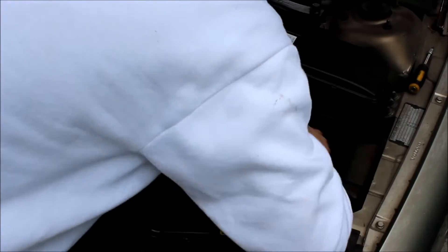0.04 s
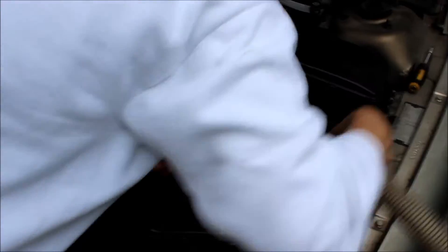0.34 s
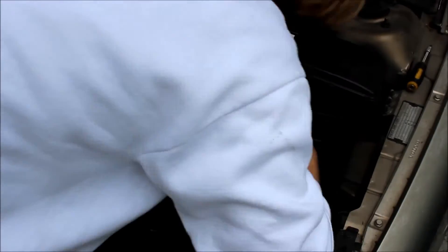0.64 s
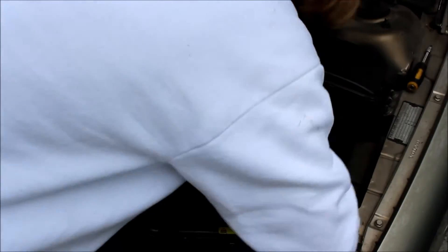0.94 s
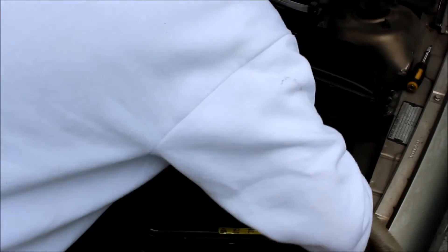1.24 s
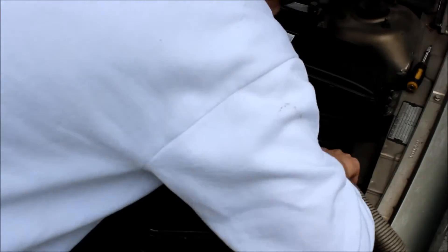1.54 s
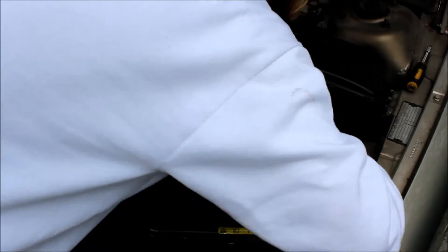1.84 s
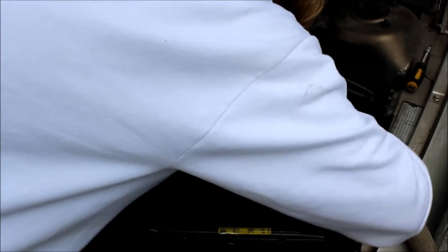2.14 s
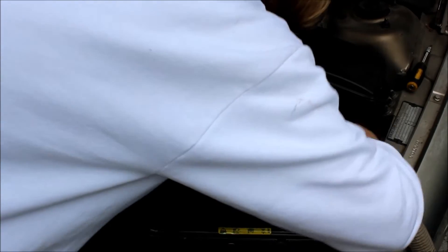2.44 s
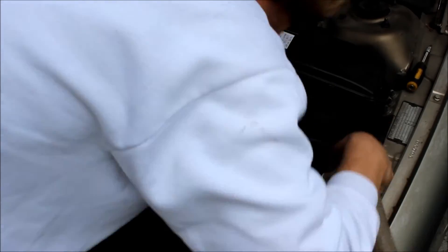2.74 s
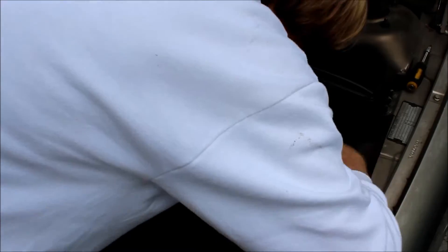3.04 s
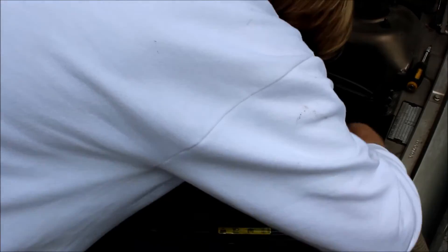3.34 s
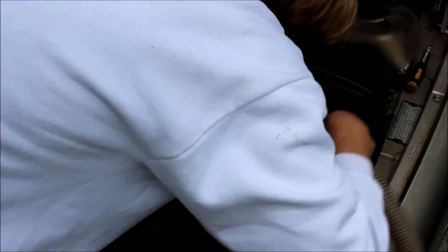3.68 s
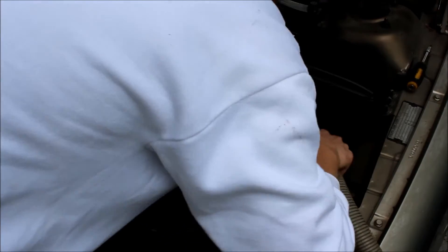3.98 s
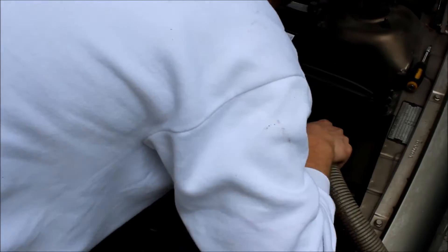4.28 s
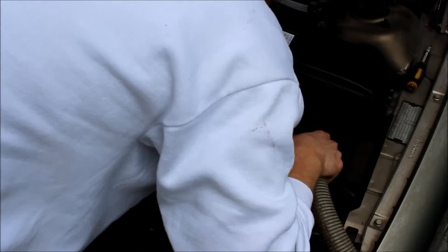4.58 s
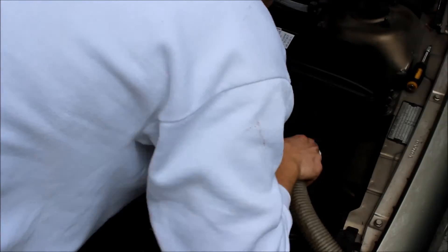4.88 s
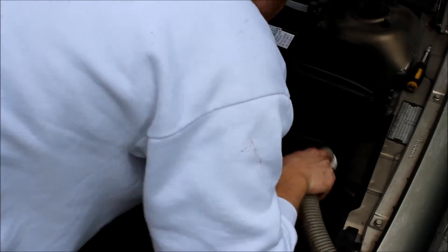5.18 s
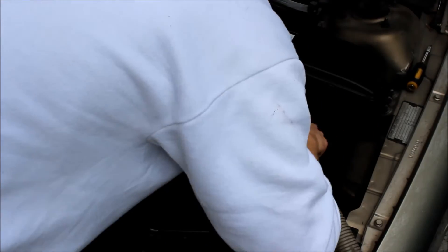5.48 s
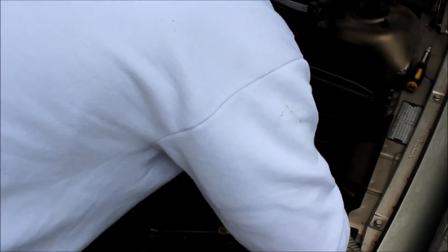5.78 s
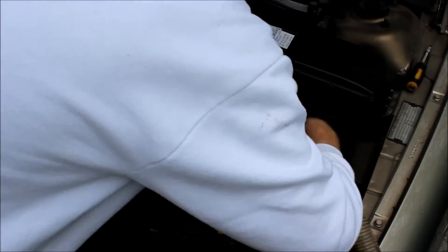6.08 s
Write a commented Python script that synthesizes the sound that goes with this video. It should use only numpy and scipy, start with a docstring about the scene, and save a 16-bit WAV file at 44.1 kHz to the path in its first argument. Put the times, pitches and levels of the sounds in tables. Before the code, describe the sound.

A vacuum cleaner runs close to the microphone, a high, even whine over rushing air, as it sucks dirt from a car's plastic air filter box. The nozzle hisses in short bursts while grit clacks and rattles up the hose. Early on it chokes briefly and the pitch rises, followed by louder hisses and clacks. The suction then turns smoother, until another flurry of grit and hissing near the end.

```python
"""A vacuum cleaner sucks dirt out of a car's air filter box, close to the microphone.
Its fan whines over rushing air. The nozzle hisses as it nears the plastic, and the motor speeds up
when it is choked. A faint drone lies underneath. Grit clacks up the hose, the hose bumps the car,
and air whistles past edges. A limiter turns everything down at loud hisses and clacks, so the whine dips."""
import sys
import numpy as np
from scipy import signal
from scipy.fft import rfft, irfft
from scipy.io import wavfile
from scipy.ndimage import uniform_filter1d, minimum_filter1d

SR = 44100
rng = np.random.default_rng(int(sys.argv[2]) if len(sys.argv) > 2 else 0)


def master(y):
    """Save y as 16-bit WAV."""
    cut = np.clip(np.atleast_2d(y).T, -1, 1)
    pcm = np.round(cut * 32767)  # scale
    wavfile.write(sys.argv[1], SR, pcm.astype(np.int16))


N = 278699
TIME = np.arange(N) / SR


def gain_of(db):
    """Turns decibels into a factor to multiply a sound by."""
    return 10 ** (np.asarray(db) / 20)


def unit_rms(x):
    """Scales a signal so that its average size (rms) is 1."""
    return x / np.sqrt(np.mean(x ** 2) + 1e-20)


def at_frequencies(rows, hz):
    """Reads between the rows of a frequency table, on a scale of octaves."""
    f, value = np.transpose(rows)
    return np.interp(np.log(hz + 1), np.log(f + 1), value)


def over_time(rows):
    """Joins the rows of a time table with straight lines: one curve per column."""
    s, *columns = np.transpose(rows)
    return [np.interp(TIME, s, column) for column in columns]


def drift(rate_hz):
    """A random wobble of size 1, up to about the given rate."""
    hz = np.fft.rfftfreq(2 ** 13, 64 / SR)
    slow = irfft(rfft(rng.standard_normal(2 ** 13)) / (1 + (hz / rate_hz) ** 2))
    return unit_rms(np.interp(np.arange(N) / 64, np.arange(2 ** 13), slow))


def tone(hz):
    """A pure tone that follows a pitch curve."""
    return np.sqrt(2) * np.sin(2 * np.pi * (np.cumsum(hz) / SR + rng.random()))


def touch(t, middle_s, length_s, squareness=3.0):
    """The nozzle closes in, stays a moment and lifts off: a curve from 0 to 1 and back."""
    return np.exp(-abs(2 * (t - middle_s) / length_s) ** squareness)


# The nozzle skims the plastic and hisses: middle t/s, length/s, extra rush/dB, brightness/dB
SKIMS = [(0.035, 0.13, 3.5, 0.2), (0.147, 0.059, 1.77, 0), (0.277, 0.12, 2.5, 1.6),
         (0.407, 0.175, 1.5, 0.3), (0.822, 0.095, 4.5, 0.5), (0.994, 0.055, 3, 0.5), (1.097, 0.093, 4, 1),
         (1.212, 0.023, 2.0, -0.5), (1.317, 0.095, 5.5, 0.5), (1.394, 0.0643, 3.5, 1),
         (1.495, 0.025, 2.5, 0.5), (1.564, 0.029, 3.5, 1.5), (1.637, 0.01, 2.5, 1), (1.739, 0.073, 3, 0.5),
         (2.031, 0.052, 9, 2.5), (2.14, 0.046, 5, 1.5), (2.199, 0.031, 9, 3), (2.341, 0.086, 10.5, 5),
         (2.537, 0.075, 6, 1.5), (3.257, 0.029, 4.5, 0.5), (3.354, 0.065, 3, 0.2), (3.441, 0.0349, 6, -0.5),
         (3.591, 0.098, 3.5, 0.9), (3.992, 0.034, 4.5, 1), (4.86, 0.059, 6, 0.5), (5.195, 0.023, 4, 0.5),
         (5.687, 0.085, 2, 0), (5.838, 0.074, 3.0, 0.6), (5.94, 0.049, 4, 2), (6.02, 0.031, 4, 1),
         (6.084, 0.042, 9, 0.5), (6.184, 0.075, 7.5, 0.5)]
# The nozzle lands flat and partly seals: middle t/s, length/s, drop in flow/dB
SEALS = [(0.145, 0.058, 0.8), (1.133, 0.062, 1.27), (1.796, 0.1, 4.5), (2.587, 0.08, 1.38),
         (5.821, 0.046, 1.95)]

def nozzle(t):
    """How the nozzle's touches change the airflow at times t."""
    rush_db = sum(db * touch(t, s, length) for s, length, db, _ in SKIMS)
    bright_db = sum(db * touch(t, s, length) for s, length, _, db in SKIMS)
    seal_db = sum(db * touch(t, s, length) for s, length, db in SEALS)
    return rush_db, bright_db, seal_db


# Pitch of the whine with the nozzle clear: t/s, f/Hz
FREE_PITCH = [(0, 1420), (.7, 1416), (1.2, 1421), (2.3, 1427), (2.9, 1413), (3.3, 1418), (4.5, 1415),
              (5.65, 1410), (5.95, 1423), (6.2, 1413), (6.32, 1410)]

def fan_pitch(rush_db, seal_db, skim_hz_per_db=4, seal_hz_per_db=29, max_skim_db=7.5, lag_s=.072):
    """A blocked fan has less air to push, so it speeds up after a short lag."""
    free_hz, = over_time(FREE_PITCH)
    rise_hz = skim_hz_per_db * np.minimum(rush_db, max_skim_db) + seal_hz_per_db * seal_db
    keep = np.exp(-1 / (lag_s * SR))
    return free_hz + signal.lfilter([1 - keep], [1, -keep], rise_hz)


# The whine chirps upward for an instant: t/s, half length/s, rise/Hz
CHIRPS = [(0.118, 0.006, 44), (0.182, 0.0044, 139.2), (1.839, 0.007115, 96.35)]
# Weak fan and motor tones: multiple of the whine's pitch, level/dB relative to the whine
MOTOR_TONES = [(1.566, -32.5), (2, -25), (2.282, -36), (2.565, -33), (3, -26), (3.852, -28)]
# Two high whistles, shaded by the body: t/s, lower one's level/dB, upper one's level/dB (same scale)
WHISTLES = [(0, -34, -15), (.45, -25, -20), (1.1, -19.5, -16), (1.9, -14.5, -22.5), (2.701, -15, -17),
            (3.2, -16, -25), (5.5, -19, -31), (5.9, -21, -19), (6.3, -20, -17)]

def fan(whine_db=-7, hum_db=-43, hum_hz=400, whistle_ratios=(5.432, 6)):
    """The blades make one strong whine; weaker tones follow its pitch, over a steady hum."""
    rush_db, _, seal_db = nozzle(TIME)
    roughness = np.clip(rush_db / 4, 0, 1)  # a narrowed nozzle stirs up the air
    hz = fan_pitch(rush_db, seal_db) + .5 * drift(30)
    chirp_hz = sum(rise * np.exp(-((TIME - s) / half) ** 2) for s, half, rise in CHIRPS)
    whine = tone(hz + chirp_hz + 10.19 * roughness * drift(68.75))
    whine /= 1 + chirp_hz / 110  # quieter during a chirp
    whine *= gain_of(0.13 * drift(31) + 0.8 * roughness * drift(180))
    motor = sum(gain_of(db + 3 * drift(1.7)) * tone(ratio * hz + 6.12 * drift(24.7))
                for ratio, db in MOTOR_TONES)
    whistles = sum(gain_of(db - 1.8 * seal_db + 0.73 * drift(7.6)) * tone(ratio * hz)
                   for ratio, db in zip(whistle_ratios, over_time(WHISTLES)))
    hum = tone(hum_hz + 2.8 * drift(18.36)) * gain_of(1.2 * drift(10))
    hum += tone(2 * hum_hz + 7 * drift(21.5)) * gain_of(2.2 * drift(10) + 0.5)
    shut_db = np.minimum(rush_db - seal_db, 0)  # a closed nozzle shuts the weaker tones in
    weak_tones = (motor + whistles) * gain_of(1.04 * shut_db)
    return gain_of(whine_db) * (whine + weak_tones) + gain_of(hum_db + shut_db) * hum


# Tone colour of freely flowing air: f/Hz, relative level/dB
FREE_AIR = [(30, -16), (70, -22), (110, -23.5), (300, -18), (600, -9), (900, -7.5), (1500, -5.5),
            (2500, -2.5), (4000, -2.5), (4700, -2), (6600, -2.5), (7300, -8), (8700, 2.5), (9900, -5),
            (10900, -8), (15700, -7.5)]
# Pitches at which the housing and hose ring: f/Hz, width/Hz, boost/dB
DUCT_RINGS = [(761, 46, 3.5), (1005, 72, 6), (1640, 28, 4.5), (1930, 67, 9.5), (2830, 140, 4),
              (4620, 410, 3.5), (5450, 98, 7.5), (6380, 240, 1.5), (8500, 580, 0), (9230, 450, 2.5),
              (9380, 100, 1.5), (9400, 70, 0), (10600, 150, 3.5), (11600, 240, 5.5), (12800, 170, 5),
              (14300, 230, 5), (14900, 110, -7)]
# Tone colour of the jet through the narrowed nozzle: f/Hz, relative level/dB
JET = [(100, -28.5), (600, -11), (1500, -1.5), (3900, 1.5), (4900, 4), (8000, -1), (11000, -4),
       (14000, -6.5), (16000, -7.5)]
# How a skim's brightness tilts the sound: f/Hz, dB of change per dB of brightness
BRIGHT_TILT = [(1200, -1.04), (4500, -2.02), (7500, 0.5), (12000, 0.9)]

def rushing_air(free_level_db=-16, flicker_db=0.6, choke=2.44):
    """Swirling air rings in the ducts; a narrowed nozzle adds a bright jet and a seal muffles the rush."""
    hz = np.fft.rfftfreq(512, 1 / SR)
    t = np.arange(N // 128 + 5) * 128 / SR
    rush_db, bright_db, seal_db = nozzle(t[:, None])
    flow_db = rush_db - seal_db
    real, imag, patches = rng.standard_normal((3, len(t), len(hz)))
    noise = real + 1j * imag  # a grid of time by frequency
    rings_db = sum(db * np.exp(-2 * ((hz - f) / width) ** 2) for f, width, db in DUCT_RINGS)
    ducts = gain_of(at_frequencies(FREE_AIR, hz) + rings_db)
    duct_power = (ducts * gain_of(choke * np.minimum(flow_db, 0))) ** 2
    jet_power = gain_of(at_frequencies(JET, hz)) ** 2 * np.maximum(gain_of(flow_db) ** 2 - 1, 0)
    # The level flickers, both in small patches of the grid and as a whole.
    patches_db = unit_rms(uniform_filter1d(uniform_filter1d(patches, 12, axis=0), 10, axis=1))
    flicker = unit_rms(uniform_filter1d(rng.standard_normal(len(t)), 5))[:, None]
    tilt_db = bright_db * at_frequencies(BRIGHT_TILT, hz)
    colour = np.sqrt(duct_power + jet_power) * gain_of(tilt_db + patches_db + flicker_db * flicker)
    free_rush = signal.istft((noise * ducts).T, nperseg=512, noverlap=384)[1][:N]
    rush = signal.istft((noise * colour).T, nperseg=512, noverlap=384)[1][:N]
    return gain_of(free_level_db) * rush / free_rush.std()


# The path of a faint, low tone: t/s, f/Hz, level/dB
DRONE = [(0, 205, -59), (.7, 218, -56), (1.5, 160, -64), (2.3, 178, -66), (2.5, 182, -49), (2.95, 194, -54),
         (3.5, 210, -54), (4.1, 228, -60), (4.5, 230, -70)]

def drone(waver_db=3, jitter_hz=2.8):
    """A thin tone, perhaps a far engine, that wavers, sinks once and slowly climbs."""
    hz, db = over_time(DRONE)
    return gain_of(db + waver_db * drift(8.3)) * tone(hz + jitter_hz * drift(28.6))


# Notes of the struck plastic hose and box: f/Hz, relative level/dB, time to fade by 60 dB/s
PLASTIC_NOTES = [(616, -14.5, 0.013), (932, -5.5, 0.026), (1220, -3, 0.043), (1528, 1, 0.066),
                 (1840, 4, 0.02), (2124, -4.5, 0.018), (2580, -12, 0.022), (3597, 5, 0.0065),
                 (3900, -27, 0.0025), (5650, -30, 0.00096), (7300, -17, 0.007)]

def clack(hardness_db, crack=0.36, low_cut_hz=620):
    """A hit rings the plastic; harder hits bring out the high notes and a sharp crack."""
    t = np.arange(2048) / SR
    hz, db, fade_s = np.transpose(PLASTIC_NOTES)[:, :, None]
    detune, phase = rng.uniform(-0.95, 1, (2, len(hz), 1))
    levels = gain_of(db + hardness_db * np.log2(hz / 1700) - 60 * t / fade_s)
    notes = levels * np.sin(2 * np.pi * hz * (1 + 0.081 * detune) * t + np.pi * phase)
    snap = rng.standard_normal(len(t)) * np.exp(-t / .001)
    sound = notes.sum(0) + crack * gain_of(3.5 * hardness_db) * snap
    sound *= 1 - np.exp(-t / .0005)
    thin_walls = signal.butter(2, low_cut_hz, "high", fs=SR, output="sos")  # they give off no bass
    sound = signal.sosfilt(thin_walls, sound)
    return sound / abs(sound).max()


# Large grit and the nozzle hit plastic: t/s, level/dB before the boost, hardness/dB per octave
KNOCKS = [(.177, -17, -5), (.221, 0, 4.5), (.312, -6, 4), (0.343, -17.5, -29), (.429, -17, -17),
          (.482, -12, -11), (.489, -13.5, -23), (0.537, -16, -5), (.753, -16, -15), (0.857, -13, -9),
          (0.893, -6.5, -1), (0.918, -15, 3), (1.029, -10, 0), (1.37, -12, 1), (1.383, -13.5, 3),
          (1.401, -9.5, -6), (1.629, -15, 3), (1.726, -20, 6), (1.986, -9, 7), (2.151, -13, -5),
          (2.176, -12, -1), (2.282, -2.5, -1), (2.429, -2, -1), (2.502, -7.5, -3), (2.764, -13, 4),
          (2.985, -12, -3), (3.003, -16, -6), (3.027, -13, -9), (3.205, -11, 1), (3.245, -7.5, 0.5),
          (3.411, -10, 1.5), (3.424, -10, 0), (5.087, -9, 2), (5.186, -7.5, 0), (5.329, -17, 3),
          (5.854, -24, 1), (5.893, -7, 4), (6.066, 0.5, 3), (6.068, 3.5, 0), (6.252, 4, 4),
          (6.307, -5, 4.5)]
# Showers of fine dirt: start t/s, length/s, grains per second, lowest grain level/dB
SHOWERS = [(0, .55, 50, -35), (0.802, .27, 50, -24), (1.25, .2, 150, -20.5), (1.549, .19, 70, -17.5),
           (1.952, .25, 130, -18.5), (2.961, 0.11, 70, -18), (5.776, .4, 100, -24), (0, 6.3, 11, -20)]

def grit(knock_boost_db=7, spread_db=5, grain_hardness_db=2.5):
    """Large pieces knock one by one, and fine dirt rattles up the hose at random."""
    hits = [(s, db + knock_boost_db, hardness_db) for s, db, hardness_db in KNOCKS]
    for start, length, per_s, db in SHOWERS:
        when, size, hardness = rng.random((128, 3))[:int(length * per_s)].T
        grain_db = db + spread_db * np.minimum(-np.log(size), 2.5)  # many quiet, a few loud
        hits += zip(start + length * when, grain_db, grain_hardness_db + 3 * (hardness - .5))
    out = np.zeros(N)
    for s, db, hardness_db in hits:
        sound = gain_of(db) * clack(hardness_db)
        slot = out[round(s * SR):][:len(sound)]
        slot += sound[:len(slot)]
    return out


# Dull bumps of the hose: t/s, f/Hz, level/dB
BUMPS = [(0.336, 187.5, -32), (0.351, 320, -29), (0.481, 489.5, -17)]

def hose_bumps(rise_s=0.0018, decay_s=0.012):
    """The soft hose knocks against the car, and the sound dies away at once."""
    out = np.zeros(N)
    for s, hz, db in BUMPS:
        t = np.maximum(TIME - s, 0)
        envelope = np.exp(-t / decay_s) * (1 - np.exp(-t / rise_s))
        out += gain_of(db) * envelope * np.sin(2 * np.pi * hz * t)
    return out


def band_noise(hz, width_hz):
    """Noise of size 1, gathered around one pitch."""
    f = np.fft.rfftfreq(2 ** 19, 1 / SR)
    spectrum = rfft(rng.standard_normal(N), 2 ** 19)
    return unit_rms(irfft(spectrum / (1 + (2 * (f - hz) / width_hz) ** 2))[:N])


# Air catches an edge of the box: middle t/s, half length/s, f/Hz, width/Hz, level/dB
EDGES = [(1.335, 0.0095, 5990, 1400, -11), (2.038, 0.022, 5000, 900, -13), (3.45, 0.012, 4747, 1096, -18),
         (3.993, .012, 6430, 914, -19), (4.87, 0.024, 6195, 1185, -18), (5.587, 0.024, 3895, 447, -20),
         (5.684, 0.064, 4730, 910, -16), (5.834, 0.016, 6500, 898, -21), (6.039, 0.01, 6420, 900, -19)]

def edge_whistles():
    """Short, breathy whistles as the nozzle slides past an edge."""
    return sum(gain_of(db) * np.exp(-((TIME - s) / half) ** 2) * band_noise(hz, width)
               for s, half, hz, width, db in EDGES)


def scene():
    """Everything reaches one microphone, so both channels are alike."""
    mix = fan() + rushing_air() + drone() + grit() + hose_bumps() + edge_whistles()
    return np.tile(mix, (2, 1))


def record(dry, ceiling_db=-5.5, hold_s=0.0057, recover_db_per_s=221, attack_s=0.0012, top_hz=15850):
    """A limiter turns loud moments down; then overloads are cut flat and bass and top treble trimmed."""
    mono = dry.mean(0)
    sensed = abs(mono + 0.21 * np.diff(mono, prepend=mono[0]))  # reacts more to treble
    over_db = np.maximum(20 * np.log10(sensed + 1e-9) - ceiling_db, 0)
    half_hold = int(hold_s * SR / 2)
    held_db = -minimum_filter1d(-over_db, 2 * half_hold + 1, origin=half_hold)
    recovery_db = TIME * recover_db_per_s
    dip_db = np.maximum.accumulate(held_db + recovery_db) - recovery_db
    keep = np.exp(-1 / (attack_s * SR))  # the start of a clack slips through before the level falls
    dip_db = signal.lfilter([1 - keep], [1, -keep], dip_db, zi=[dip_db[:500].max()])[0]
    limited = np.clip(dry / gain_of(dip_db), -1, 1)
    bass = signal.lfilter(*signal.butter(1, 132, fs=SR), limited)  # below 132 Hz
    treble_cut = signal.firwin(511, top_hz, window=("kaiser", 9), fs=SR)
    return signal.oaconvolve(limited - 0.12 * bass, treble_cut[None], "same")


dry = scene()
out = record(dry)
master(out)
```